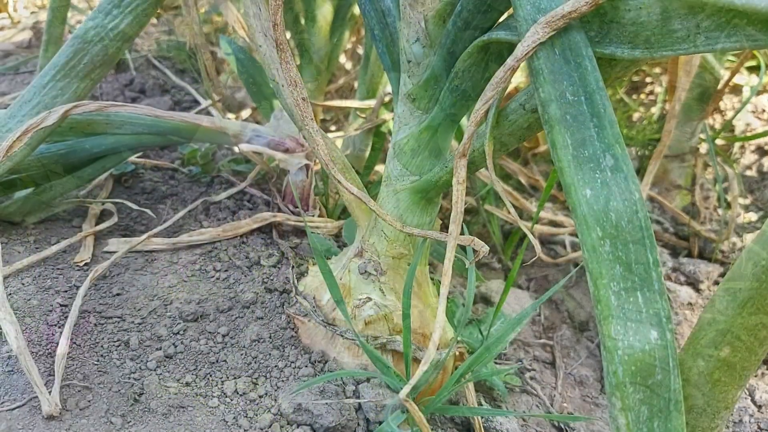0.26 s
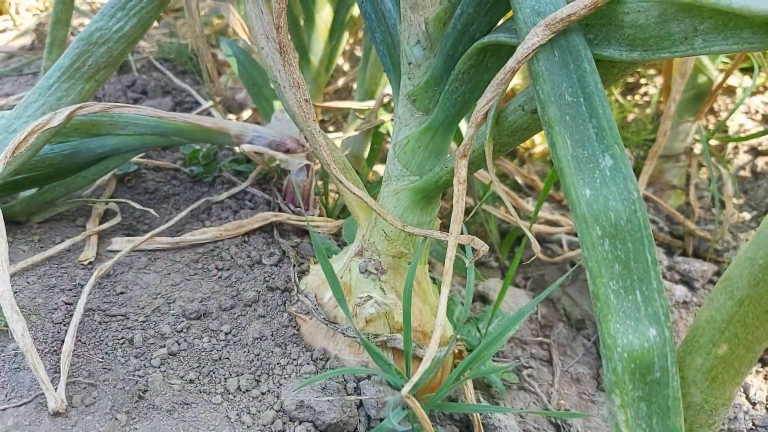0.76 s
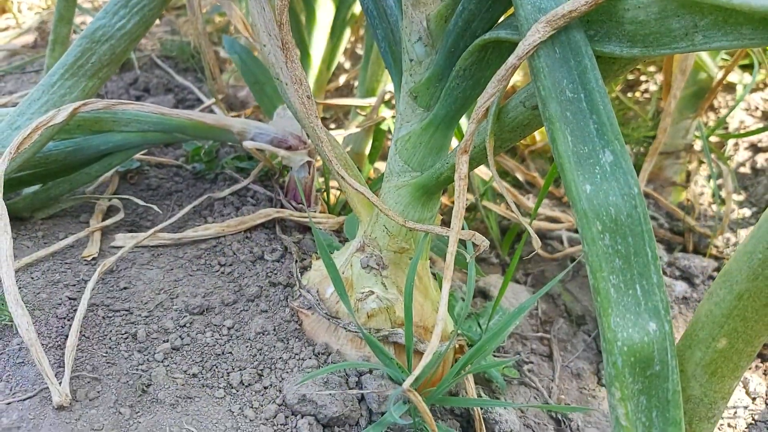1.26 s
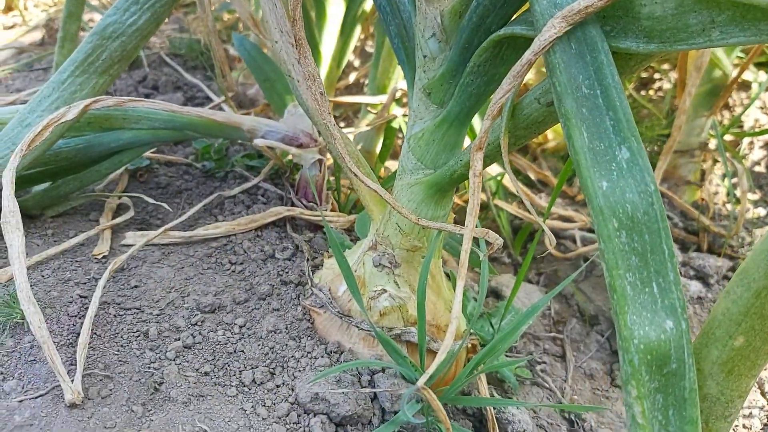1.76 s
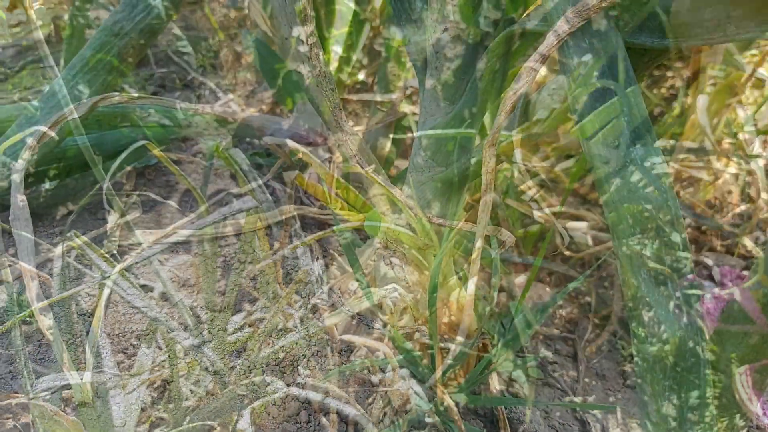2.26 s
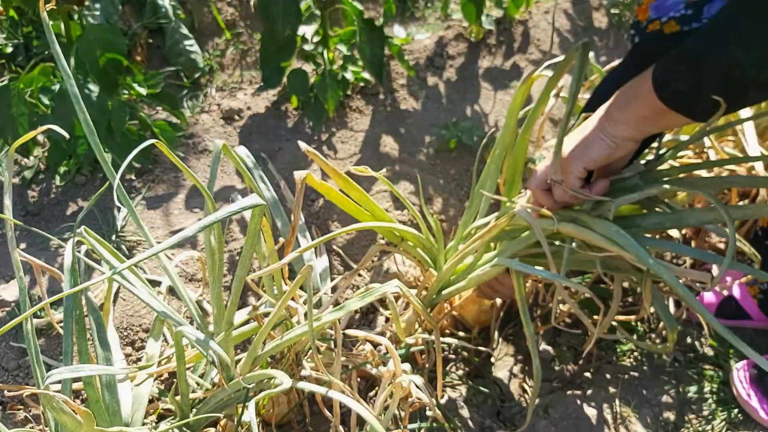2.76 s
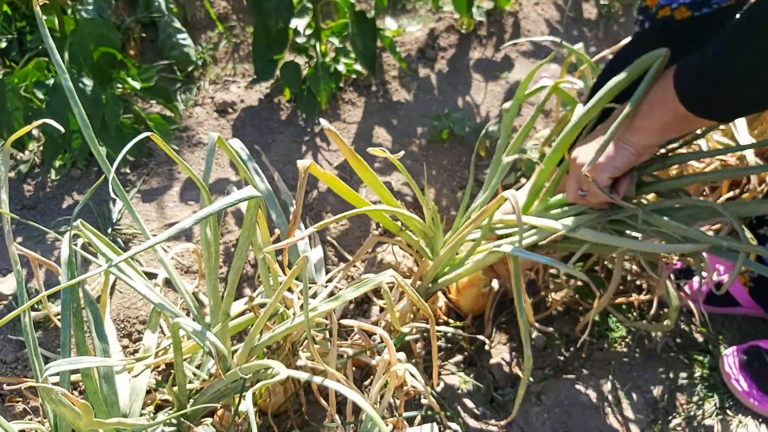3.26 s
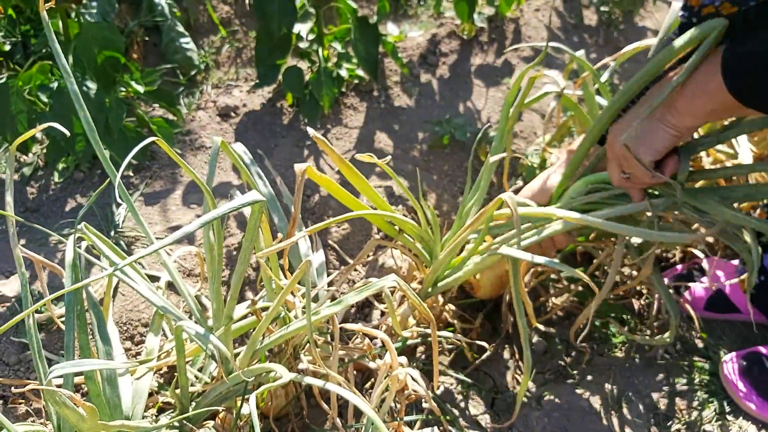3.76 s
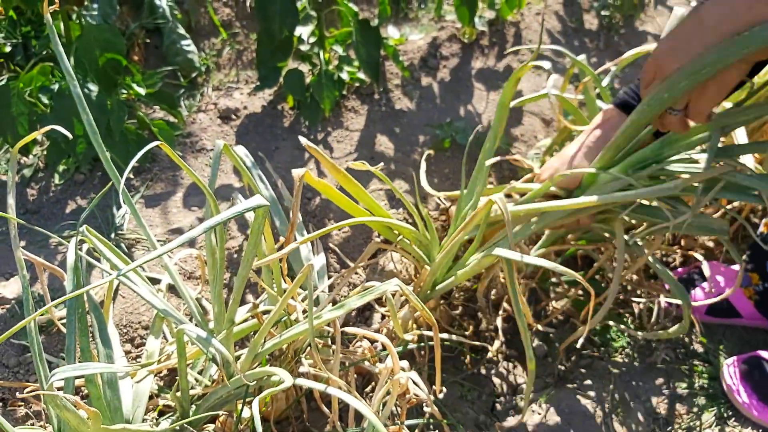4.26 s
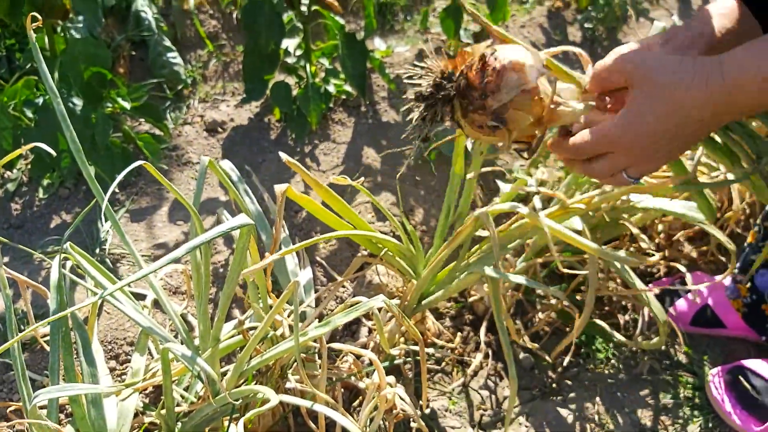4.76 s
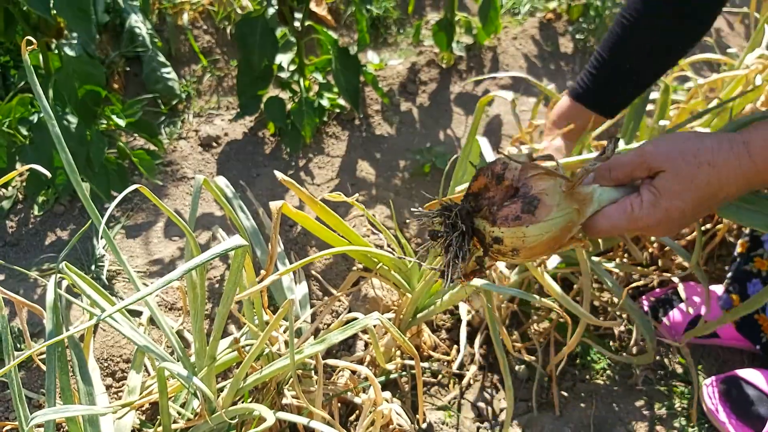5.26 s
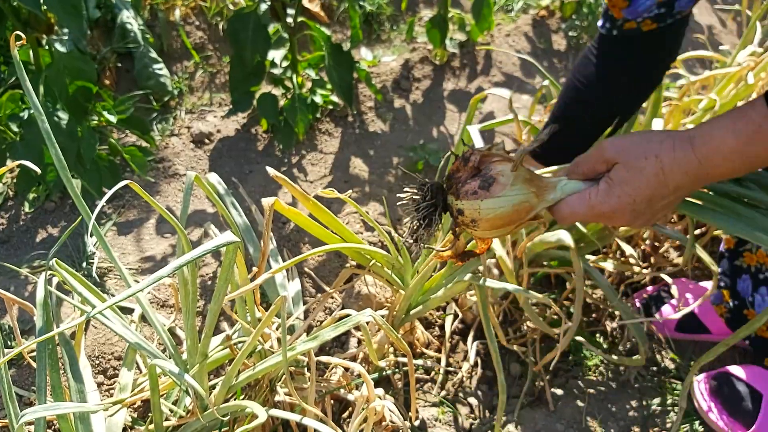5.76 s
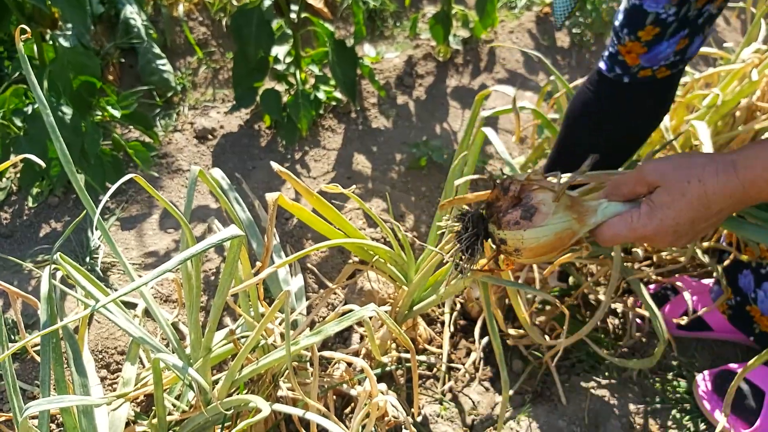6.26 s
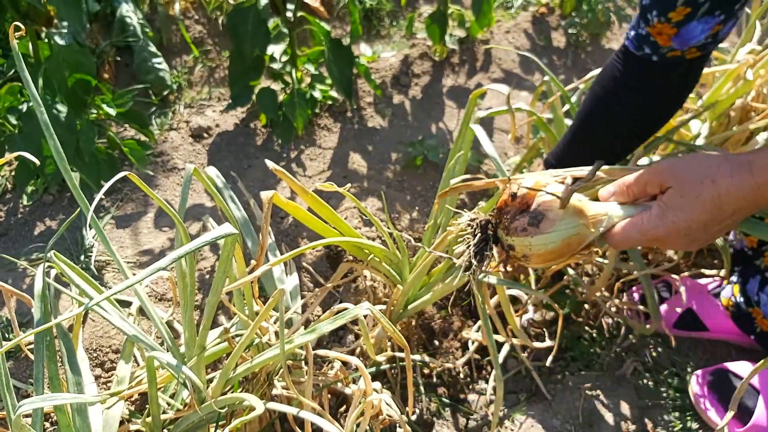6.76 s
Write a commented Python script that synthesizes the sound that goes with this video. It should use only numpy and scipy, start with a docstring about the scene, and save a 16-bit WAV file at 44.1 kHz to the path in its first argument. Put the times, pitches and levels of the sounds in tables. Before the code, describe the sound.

Near-silent outdoor air first, then close-up handling of a dry plant slightly to the right. Leaves scrape and crinkle in short strokes, with soft low wind bumps on the microphone. After a brief lull, a cluster of dull root pops and fine tearing leads into strong rustles and sharp cracks as the onion is pulled, followed by papery peeling snaps and a faint hum. Dry open air, no echo.

```python
"""In a garden, close by and a little to the right, an onion is pulled by hand from dry soil.
Leaves rub, crinkle and snap: noise and tiny ringing grains follow the strokes of the hand.
Roots pop as they tear, each a sharp tick with a short hollow ring, and crumbs of earth shift.
Behind lie a quiet rumble, a hiss of air and a faint bird of sliding tones; a low drone swells
towards the end, and gusts of low noise buffet the microphone."""
import sys
import numpy as np
from scipy import signal
from scipy.fft import rfft, irfft, next_fast_len
from scipy.io import wavfile
from scipy.ndimage import uniform_filter1d, map_coordinates

SR = 44100
rng = np.random.default_rng(int(sys.argv[2]) if len(sys.argv) > 2 else 0)


def generate_wav(signal):
    """Clip the signal to [-1, 1] and save it as 16-bit WAV at the path in sys.argv[1]."""
    frames = np.transpose(np.atleast_2d(signal))
    scaled = np.clip(frames, -1, 1) * 32767
    pcm = np.round(scaled).astype(np.int16)
    wavfile.write(sys.argv[1], SR, pcm)


N = 309582  # length in samples

# Strokes of the hand: from 2.1 s it grips the leaves, from 3.5 s it rocks the bulb loose and
# pulls it out, from 5 s it strips the dry skins: start_s, length_s, leaf_level_db, soil_level_db
STROKES = [ (2.135, 0.059, -39, -62.5), (2.6, 0.075, -43, -57.5), (2.67, 0.09, -37.5, -61),
           (2.745, 0.19, -39.5, -63), (2.895, 0.14, -39, -66.5), (3.02, 0.15, -44, -59.5),
           (3.51, 0.23, -41, -57.5), (3.78, 0.19, -31.5, -56), (3.98, 0.15, -33, -58),
           (4.14, 0.15, -38.5, -61.5), (4.31, .14, -30.5, -54), (4.45, 0.25, -33.5, -53.5),
           (4.71, .15, -32.5, -52), (4.86, 0.15, -40, -58), (5.03, 0.21, -46, -65.5),
           (5.345, .11, -36.5, -62), (5.455, 0.29, -45.5, -77), (5.805, 0.12, -38, -66.5),
           (5.955, 0.12, -33.5, -58.5), (6.07, 0.24, -40.5, -66), (6.29, 0.14, -45, -53),
           (6.45, 0.043, -37, -55), (6.5, 0.13, -42, -59), (6.66, 0.1, -38.5, -60),
           (6.78, 0.12, -33, -54.5), (6.91, 0.22, -37.5, -55)]
# The held plant stirs beneath the strokes: start_s, length_s, leaf_level_db, soil_level_db
STIRRING = [(2.04, .1, -64, -95), (2.14, 1.22, -52, -72.5), (3.29, 4.8, -52.5, -72)]
# Loudest snaps of dry leaves and skins: start_s, nominal_peak_db, ring_hz, low_crack_db,
# crumble_db (before a common cut of 12 dB)
SNAPS = [(1.8696, -42.5, 9350, -11, 10), (2.128, -24, 6940, -28, 3), (2.1424, -21, 9900, -10, 5),
         (2.1809, -19.5, 9450, -10, 11), (2.213, -18, 12100, -26, 1), (2.373, -21, 4600, -42, -5),
         (2.598, -23, 13200, -25, -5), (2.6152, -14.5, 12600, -8, -1), (2.643, -17.5, 13000, -29, 1),
         (2.6886, -12, 12600, -8.5, 0), (2.7122, -12, 12800, -1.5, -8), (2.9471, -17, 11700, -45, -4),
         (2.9939, -19, 12400, -30, -3), (3.0966, -22.5, 4040, -2, -1), (3.1164, -17.5, 7400, -4, -3),
         (3.1715, -21.5, 7460, -7, -1), (3.246, -19, 9400, -7.5, -9.5), (3.6361, -19.5, 9500, -27, -6),
         (3.666, -18.5, 12400, -18, -1), (3.8429, -15, 3180, 1, 12), (4.4784, -17, 3140, -13, 8),
         (4.5058, -13, 12600, -7, 7), (4.5563, -14.5, 5860, -1, -6), (4.5735, -15.5, 3430, -16, -11),
         (4.603, -19.5, 3940, -20, -12), (4.644, -19, 11900, -27, -3), (4.6927, -13.5, 11500, -16, 3),
         (4.757, -11, 9200, -4.5, 16), (4.778, -12.5, 12200, -5, -2), (4.8167, -14.5, 9300, -19, -2),
         (4.8305, -22.5, 7650, -6, 4), (5.063, -13.5, 7600, -33, -10), (5.185, -21.5, 12600, -9, -2),
         (5.3786, -12.5, 12200, -9.5, 3), (5.5431, -23.5, 8560, -29, 6), (5.937, -18.5, 12200, -2, -14),
         (5.972, -10.5, 8000, -31, -8), (6.0404, -9.5, 12300, -9.5, -2), (6.2051, -23.5, 3140, -29.5, -14),
         (6.2306, -19, 9900, -21, 18), (6.2597, -10.5, 9700, -38, -19), (6.33, -23, 3880, 0, -9),
         (6.3824, -8.5, 4100, -22, -4), (6.3876, -18.5, 9490, 2, 5.5), (6.452, -22.5, 12300, -19, 12)]
# Loudest root pops and stem knocks: start_s, level_db, pitch_hz, tick_brightness_db,
# ring_cycles (before a common scaling)
POPS = [(1.634, -49.5, 625, -30, 1.2), (2.182, -34.5, 920, 7.5, 1.4), (3.35, -31.5, 507, -24, 0.78),
        (3.387, -32, 835, 0, 0.47), (3.405, -39.5, 470, 10.5, 0.62), (3.463, -26.5, 930, 1.5, 0.71),
        (3.491, -32, 434, 3, 0.81), (3.528, -33, 845, 10.5, 1.1), (3.574, -34.5, 400, 4, .6),
        (3.603, -29.5, 947, 1, .57), (3.741, -27.5, 960, 0, .4), (3.756, -25.5, 600, 1, 0.25),
        (3.777, -29.5, 1040, -1, 1), (3.798, -26.5, 336, -15, 0.41), (4.072, -30.5, 1210, 1, 0.47),
        (4.691, -20.5, 860, -27, 1.3), (4.776, -27, 690, -12, 0.86), (5.077, -28.5, 1040, -25, 1.4),
        (5.419, -41, 428, -12, 1.3), (6.376, -30.5, 1170, 4.5, 1.2), (6.435, -31, 885, -17, .9)]
# Runs of fine roots tearing one after another: start_s, length_s, level_db
TEARS = [(3.371, .08, -39.5), (3.451, .15, -36.5), (3.709, 0.18, -33), (6.38, .07, -36.5)]
# Leaves dragging over each other: start_s, length_s, level_db, centre_hz, width_hz
SCRAPES = [(0.784, 0.064, -67, 8360, 9000), (2.14, 0.031, -32.5, 9700, 8300),
           (2.173, 0.024, -44.5, 920, 444), (3.733, 0.084, -45, 760, 1100),
           (4.456, 0.17, -38.5, 3300, 1400), (4.678, 0.038, -41.5, 890, 450),
           (4.732, 0.032, -24.5, 10400, 6000), (4.813, 0.03, -22.5, 8800, 4500),
           (5.062, 0.0056, -20, 7560, 1470)]
# Gusts on the microphone: start_s, length_s, level_db
GUSTS = [(1.67, 0.064, -60), (2.3, .1, -38), (2.55, 0.19, -50), (2.67, 0.21, -48), (2.9, .22, -51),
         (3.12, 1.24, -63), (3.8, 0.1, -47.5), (4.07, 0.094, -54), (5.63, .1, -59), (5.94, 0.13, -57.5)]
# Whistles of a far bird: start_s, length_s, start_hz, end_hz, level_db
CHIRPS = [(.14, .07, 5400, 5250, -73), (1.775, .045, 6900, 6700, -60), (1.99, .14, 6000, 4500, -62)]
# Slow changes of the surroundings: time_s, rumble_db, air_hiss_db
OUTDOOR_LEVELS = [(0.0, -71.5, -75.5), (.55, -71, -73), (1.05, -62.5, -69.5), (1.5, -66.5, -70.5),
                  (2.0, -68, -67.5)]

# Colour of rubbing leaves: pitch_hz, level_db
LEAF_COLOUR = [(2500, -31.5), (4200, -4), (4900, -6.5), (6100, -6), (8200, -1), (10300, -2.5), (12400, .5),
               (14200, -2), (16000, -19)]
# Colour of rubbing stalks: pitch_hz, level_db
STALK_COLOUR = [(440, -36.5), (750, -15.5), (924, -4), (1010, -8), (1220, -1), (1550, -9), (1780, -0.5),
                (1970, -10.5), (2200, -1.5), (2450, -6), (3120, 0), (4070, 1), (5500, -8), (7150, -27),
                (12100, -120)]
# Colour of shifting soil: pitch_hz, level_db
SOIL_COLOUR = [(76, -21), (130, -24), (171, -6), (380, -2.5), (430, -2.5), (594, -7.5), (769, -1),
               (1100, -6.5), (1430, -36), (2420, -120)]
# Bright colour of splintering leaves: pitch_hz, level_db
SPLINTER_COLOUR = [(1500, -21), (4000, -1), (6000, -5), (8000, -0.5), (10500, -3), (12500, -0.5),
                   (16000, -13.5)]
# Lower colour of cracking fibres: pitch_hz, level_db
CRACK_COLOUR = [(200, -39.5), (800, 5.5), (2000, 6.5), (3800, 8), (5500, 12), (9000, -37)]
# Colour of wind on the microphone: pitch_hz, level_db
GUST_COLOUR = [(12, -44), (20, -2), (48, 1), (72, 1), (96, -7), (140, -19), (220, -29.5), (290, -47),
               (480, -120)]
# Colour of the distant rumble: pitch_hz, level_db
RUMBLE_COLOUR = [(12, -62), (20, -38), (40, -25), (51, 3), (146, -2), (202, -7.5), (252, -14.5), (368, -15),
                 (401, -19.5), (605, -31), (1200, -43), (1560, -64), (2640, -120)]
# Colour of the air hiss: pitch_hz, level_db
AIR_COLOUR = [(590, -5), (1000, -6), (1790, -5), (1910, -4.5), (2330, -1), (2680, -3.5), (2910, -2.5),
              (3300, -7), (3890, -2.5), (6550, 0), (10300, -10.5), (12300, -7.5), (16000, -13)]
# Colour of the noise around the drone: pitch_hz, level_db
HUM_COLOUR = [(90, -22.5), (150, -17), (172, -16), (188, -13), (205, -13), (300, -16), (480, -49)]
# How alike left and right are: pitch_hz, likeness (0 unrelated, 1 the same)
LIKENESS = [(60, .5), (300, 0.68), (700, 0.6), (1400, 0.39), (3000, 0.1), (7000, 0)]
# Balance of the two sides: pitch_hz, left_minus_right_db
BALANCE = [(60, -2), (110, -8), (200, -9), (380, -10), (700, -4.5), (1290, -4), (2380, -7), (4400, -3),
           (8120, -6.5), (15000, -8)]

# Time constants of the soft level edges, in seconds
STROKE_RISE_S, STROKE_FALL_S = 0.011, 0.0083
GUST_RISE_S, GUST_FALL_S = 0.0034, 0.0097
# Stalks follow the leaves: stalk level at the usual leaf level, and dB gained per dB of leaves
USUAL_LEAF_DB, STALK_DB, STALK_GROWS = -38.5, -45.5, 0.91
# Breaking fibres: level against the rustle, range of strength, leaf ticks' dB per dB of leaves
CRINKLE_DB, CRINKLE_RANGE_DB, CRINKLE_GROWS = -6.5, 16, 0.79
# A snap: time to swell and to die by 60 dB, for the break and for its crumbling; cut from peak to rms
BREAK_RISE_S, BREAK_T60_S = 0.0013, 0.0032
CRUMBLE_RISE_S, CRUMBLE_T60_S, SNAP_CREST_DB = 0.02, 0.043, 22.5
# Fine roots: number a second in a run, middle pitch and its scatter (doubled when used)
ROOTS_PER_S, ROOT_HZ, ROOT_SPREAD_OCT = 55, 804, 0.92
# Fine roots: tick brightness, ring (before a common scaling), scatter of strength either way
ROOT_BRIGHT_DB, ROOT_CYCLES, ROOT_SPREAD_DB = 1.5, 0.55, 1.5
DRONE_START_S, DRONE_FULL_S, DRONE_DB = 5.9, 6.9, -54
# Microphone: bass roll-off and upper band limit
BASS_HZ, TOP_HZ = 34, 16150


def amp(db):
    """Turn decibels into a gain."""
    return 10 ** (np.asarray(db) / 20)


def unit(x):
    """Scale to an average strength (rms) of 1."""
    return x / np.sqrt(np.mean(x ** 2) + 1e-20)


def along(points, hz):
    """Read a curve of (Hz, value) points on a log pitch axis."""
    f, v = np.transpose(points)
    return np.interp(np.log(hz + 1), np.log(f + 1), v)


def curves(rows):
    """Give one value per sample for each column after the time."""
    s, *cols = np.transpose(rows)
    return [np.interp(np.arange(N) / SR, s, c) for c in cols]


def swells(rows, rise_s, fall_s):
    """Give a dB curve per level column: each row eases in, holds and dies away; powers add."""
    t = np.arange(0, N / SR, .001)
    power = np.full((len(rows[0]) - 2, len(t)), 1e-12)  # a tiny floor keeps the log finite
    for s, length, *levels in rows:
        onset = .5 + .5 * np.tanh(.5 * (t - s) / rise_s)
        release = .5 + .5 * np.tanh(.5 * (s + length - t) / fall_s)
        power += amp(levels)[:, None] ** 2 * onset * release
    return curves(np.column_stack([t, *(10 * np.log10(power))]))


def wobble(rate):
    """Draw a smooth random curve through rate points a second."""
    points = rng.standard_normal(int(N * rate / SR) + 4)
    return map_coordinates(points, [np.arange(N) * rate / SR])


def filtered(x, response):
    """Change each pitch in x by a response given as a function of Hz."""
    size = next_fast_len(x.shape[-1] + 4096)
    gain = response(np.fft.rfftfreq(size, 1 / SR))
    return irfft(rfft(x, size) * gain, size)[..., :x.shape[-1]]


def coloured(x, spectrum, size=4096):
    """Colour a sound with a filter that acts only after each input, so attacks stay sharp."""
    cepstrum = irfft(np.log(amp(along(spectrum, np.fft.rfftfreq(size, 1 / SR)))))
    # folding the cepstrum moves the filter's energy to its beginning (minimum phase)
    cepstrum[1:size // 2] *= 2
    cepstrum[size // 2 + 1:] = 0
    impulse = irfft(np.exp(rfft(cepstrum)))
    return signal.fftconvolve(x, impulse[None], axes=1)[:, :x.shape[1]]


def resonance(x, hz, width_hz):
    """Ring at one pitch; a narrower width rings longer."""
    return filtered(x, lambda f: 1j * f * width_hz / (hz ** 2 - f * f + 1j * f * width_hz))


def stereo(pair):
    """Blend two unrelated signals into sides alike in the bass and unrelated in the treble."""
    def mid_and_side(hz):
        turn = np.arccos(np.clip(along(LIKENESS, hz), -1, 1)) / 2
        return np.array([np.cos(turn), np.sin(turn)])

    mid, side = filtered(pair, mid_and_side)
    return np.array([mid + side, mid - side])


def rush(spectrum):
    """Make steady coloured stereo noise with an rms of 1."""
    noise = rng.standard_normal((2, N))
    return unit(stereo(filtered(noise, lambda hz: amp(along(spectrum, hz)))))


def rough_noise(length, rough_db):
    """Make two channels of noise with a shared level that flickers over less than a millisecond."""
    flicker = unit(uniform_filter1d(rng.standard_normal(length), size=30))
    return rng.standard_normal((2, length)) * amp(rough_db * flicker)


def glide(length, start_hz, end_hz):
    """Make a soft sliding tone, alike on both sides."""
    hz = np.linspace(start_hz, end_hz, int(length * SR))
    tone = np.sin(2 * np.pi * np.cumsum(hz) / SR)
    return np.tile(np.hanning(len(hz)) * tone, (2, 1))


def add(track, s, sound):
    """Mix a stereo sound into the track at time s."""
    part = track[:, max(round(s * SR), 0):][:, :sound.shape[1]]
    part += sound[:, :part.shape[1]]


def handling():
    """Set leaf, stalk and soil levels in dB as the hand works the plant stroke by stroke."""
    leaf_db, soil_db = swells(list(STROKES) + list(STIRRING), STROKE_RISE_S, STROKE_FALL_S)
    stalk_db = STALK_DB + STALK_GROWS * (leaf_db - USUAL_LEAF_DB)
    return leaf_db, stalk_db, soil_db


def grains(rate, centre_hz, cycles, spread_db, size=256):
    """Scatter tiny fractures, each a quickly fading ring with its own pitch, strength and place."""
    count = int(rate * N / SR)
    when, strength, phase = rng.random((3, count, 1))
    pitch, side = rng.standard_normal((2, count, 1))
    hz = np.minimum(centre_hz * np.exp(.45 * pitch), SR / 2.5)
    age = np.arange(size) / SR
    strength_db = spread_db * np.minimum(-np.log(1 - strength), 4.5)
    fade = amp(strength_db) * np.exp(-age * hz / cycles)
    at = ((when * N).astype(int) + np.arange(size)).ravel()
    channels = []
    for sign in (1, -1):  # left, right
        wave = np.sin(2 * np.pi * hz * age + sign * np.pi * phase)
        sound = amp(2 * sign * side) * fade * wave
        channels.append(np.bincount(at, sound.ravel(), N)[:N])
    return unit(np.array(channels))


def friction(crackle, share, spectrum, patchy_db):
    """Mix grains with sliding hiss; the colour shifts as other parts come into contact."""
    share = np.clip(share, 0, 1)  # part of the power given to the grains
    hiss = unit(coloured(rng.standard_normal((2, N)), spectrum))
    mix = np.sqrt(share) * unit(coloured(crackle, spectrum)) + np.sqrt(1 - share) * hiss
    z = signal.stft(mix, nperseg=256)[2]
    # random patches, smoothed over pitch and then over time
    patches = uniform_filter1d(rng.standard_normal(z.shape[1:]), size=7, axis=0)
    patches = uniform_filter1d(patches, size=12, axis=1)
    shifting = signal.istft(z * amp(patchy_db * unit(patches)), nperseg=256)[1]
    return unit(stereo(shifting[:, :N]))


def rustle(leaf_db, stalk_db, soil_db):
    """Leaves, stalks and soil stick and slip together under the hand."""
    slip = wobble(70)
    leaf_grains = grains(rate=2200, centre_hz=9400, cycles=0.58, spread_db=1.5)
    stalk_grains = grains(rate=800, centre_hz=2560, cycles=1.0, spread_db=2.5)
    soil_grains = grains(rate=260, centre_hz=680, cycles=1.0, spread_db=0, size=512)
    leaves = friction(leaf_grains, share=0.18, spectrum=LEAF_COLOUR, patchy_db=1.43)
    stalks = friction(stalk_grains, share=0.15, spectrum=STALK_COLOUR, patchy_db=1.5)
    soil = friction(soil_grains, share=0.4, spectrum=SOIL_COLOUR, patchy_db=2.5)
    return (amp(leaf_db + 1.12 * slip + 1.43 * wobble(220)) * leaves
            + amp(stalk_db + 0.92 * slip) * stalks
            + amp(soil_db + 0.48 * slip) * soil)


def crinkle(leaf_db, stalk_db):
    """Brittle fibres give way with dry ticks, stronger the harder the leaves are worked."""
    when, size = rng.random((520, 2)).T
    breaks = np.bincount((when * N).astype(int), amp(CRINKLE_RANGE_DB * size ** 3), N)
    # each break sheds a burst of noise that falls by 60 dB in 7 ms
    bursts = signal.fftconvolve(breaks, amp(-60 * np.arange(512) / SR / .007))[:N]
    ticks = rng.standard_normal((2, N)) * bursts
    flakes = unit(coloured(ticks, SPLINTER_COLOUR))
    fibres = unit(coloured(stereo(ticks), CRACK_COLOUR))
    against_rustle_db = CRINKLE_DB + (CRINKLE_GROWS - 1) * (leaf_db - USUAL_LEAF_DB)
    return amp(against_rustle_db) * (amp(leaf_db) * flakes + amp(stalk_db) * fibres)


def snaps():
    """A dry blade breaks within about a millisecond, rings briefly and crumbles in smaller cracks."""
    lead = .010  # seconds of swelling kept before the break
    track = np.zeros((2, N))
    t = np.arange(4096) / SR - lead
    for s, db, ring_hz, crack_db, crumble_db in SNAPS:
        breaking = amp(-60 * np.maximum(t / BREAK_T60_S, -t / BREAK_RISE_S))
        crumble_fade_db = -60 * np.maximum(t / CRUMBLE_T60_S, -t / CRUMBLE_RISE_S)
        crumbling = amp(crumble_db - 12.0 + crumble_fade_db)
        fracture = rough_noise(len(t), rough_db=2.5) * breaking
        fracture = fracture + rough_noise(len(t), rough_db=6.5) * crumbling
        splinter = unit(coloured(fracture, SPLINTER_COLOUR))
        ring = unit(resonance(fracture, ring_hz, width_hz=570))
        crack = unit(coloured(stereo(fracture), CRACK_COLOUR))
        sound = splinter + 0.64 * ring + amp(crack_db) * crack
        add(track, s - lead + .0012, amp(db - SNAP_CREST_DB) * unit(sound))
    return track


def fine_roots(count=32):
    """Fine roots part at uneven intervals in each tearing run; rows have the columns of POPS."""
    rows = []
    for start, length, db in TEARS:
        for k, (late, strength, pitch) in enumerate(rng.uniform(-1, 1, (count, 3))):
            delay = (k + .5 + .5 * late) / ROOTS_PER_S
            if delay < length:
                level_db = db + ROOT_SPREAD_DB * strength
                hz = ROOT_HZ * 2 ** (2 * ROOT_SPREAD_OCT * pitch)
                rows.append((start + delay, level_db, hz, ROOT_BRIGHT_DB, ROOT_CYCLES))
    return rows


def pops():
    """A root parts or a stem knocks: a sharp tick and a dull hollow ring soon damped by the earth."""
    track = np.zeros((2, N))
    t = np.arange(2048) / SR
    tick_colour = [(500, 2.5), (1900, 6), (4000, 5.0), (7000, -7), (14000, -44)]
    for s, db, hz, bright_db, cycles in list(POPS) + fine_roots():
        age = t * hz / max(0.75 * cycles, .2)
        ring = np.sin(2 * np.pi * hz * t) * age * np.exp(1 - age)
        # a quick burst with a weaker, longer tail
        fade = amp(-60 * t / 0.0018) + amp(-18.5 - 60 * t / 0.096)
        tear = stereo(rough_noise(len(t), rough_db=-2.0) * fade)
        grit = unit(coloured(tear, [(120, -20), (hz, 0), (2200, -8), (6000, -26)]))
        tick = unit(coloured(tear, tick_colour))
        sound = 0.52 * ring + 0.057 * grit + 0.063 * amp(bright_db) * tick
        add(track, s + 0.00114, amp(db) * sound)
    return track


def scrapes():
    """A dragging blade makes a short rough swell around its own resonance."""
    track = np.zeros((2, N))
    for s, length, db, hz, width_hz in SCRAPES:
        swell = signal.windows.tukey(int(length * SR))
        drag = resonance(rough_noise(len(swell), rough_db=7), hz, width_hz)
        drag = resonance(drag, hz, width_hz)  # a second pass narrows the sound
        add(track, s, amp(db) * unit(stereo(drag)) * swell)
    return track


def wind():
    """Gusts of low noise press mostly on the right microphone port."""
    buffet_db, = swells(GUSTS, GUST_RISE_S, GUST_FALL_S)
    return amp(buffet_db) * rush(GUST_COLOUR) * amp([[-10], [3]])


def bird():
    """Short falling whistles come from far off, fluttering through the foliage."""
    track = np.zeros((2, N))
    for s, length, start_hz, end_hz, db in CHIRPS:
        add(track, s, amp(db) * glide(length, start_hz, end_hz))
    return track * np.array([wobble(200), wobble(220)])


def drone():
    """A low tone of wavering pitch and level swells together with steady low noise."""
    drone_hz = 187 + 5 * wobble(9.5)
    tone = np.sin(2 * np.pi * np.cumsum(drone_hz) / SR) * amp(1.9 * wobble(28))
    swell = np.interp(np.arange(N) / SR, [DRONE_START_S, DRONE_FULL_S], [0, 1])
    return amp(DRONE_DB) * swell * (0.81 * tone + 0.92 * rush(HUM_COLOUR))


def outdoors():
    """Noise makes a wavering distant rumble and thin air hiss; a low falling tone and a drone join."""
    rumble_db, air_db = curves(OUTDOOR_LEVELS)
    rumble = amp(rumble_db + 2.4 * wobble(6)) * rush(RUMBLE_COLOUR)
    track = rumble + amp(air_db) * rush(AIR_COLOUR)
    add(track, 1.835, amp(-59.5) * glide(length=0.128, start_hz=223, end_hz=140))
    return track + drone()


def scene():
    """Mix the plant and its surroundings, all reaching the right side more strongly."""
    leaf_db, stalk_db, soil_db = handling()
    plant = rustle(leaf_db, stalk_db, soil_db) + crinkle(leaf_db, stalk_db)
    plant = plant + snaps() + pops() + scrapes()
    garden = plant + wind() + bird() + outdoors()
    half = np.array([.5, -.5])[:, None]  # half the balance to each side
    return filtered(garden, lambda hz: amp(half * along(BALANCE, hz) - 0.55))


def record(dry):
    """The microphone loses deep bass, rounds off hard cracks and keeps nothing above its band limit."""
    pressure = filtered(dry, lambda hz: hz ** 2 / np.sqrt(hz ** 4 + BASS_HZ ** 4))
    rounded = pressure / (1 + (pressure / .75) ** 4) ** .25
    return filtered(rounded, lambda hz: hz < TOP_HZ)


dry = scene()
out = record(dry)
generate_wav(out)
```